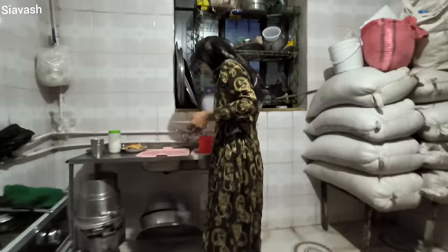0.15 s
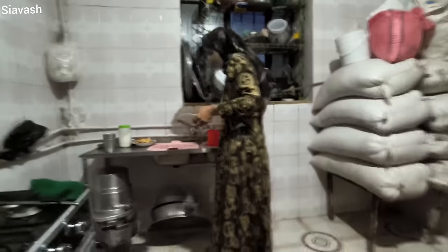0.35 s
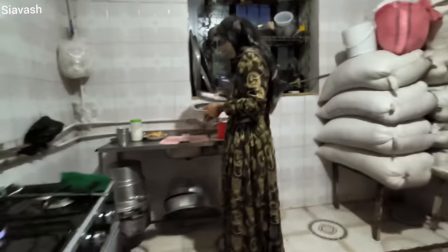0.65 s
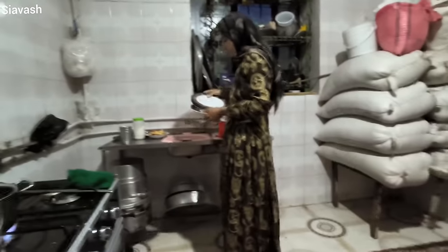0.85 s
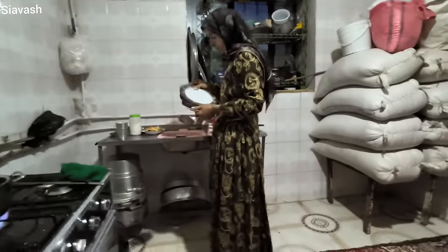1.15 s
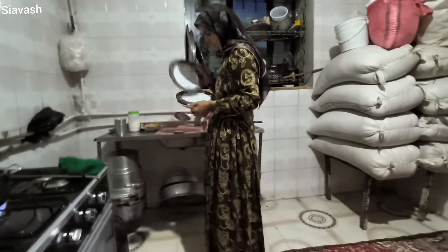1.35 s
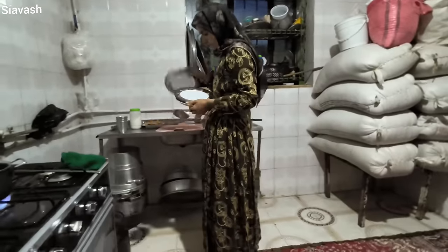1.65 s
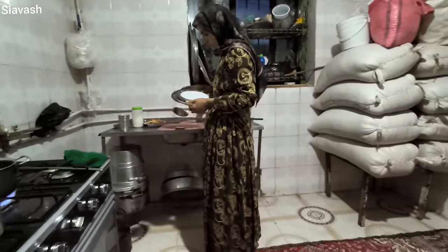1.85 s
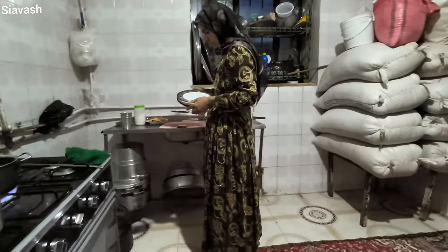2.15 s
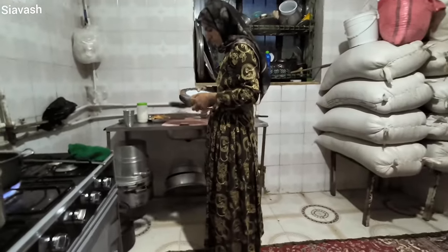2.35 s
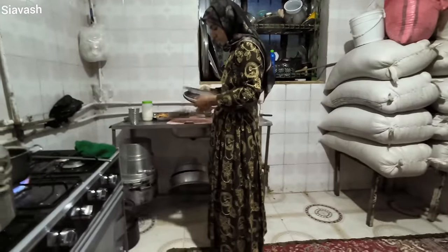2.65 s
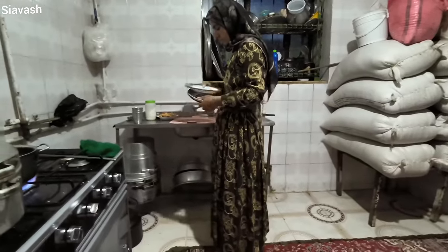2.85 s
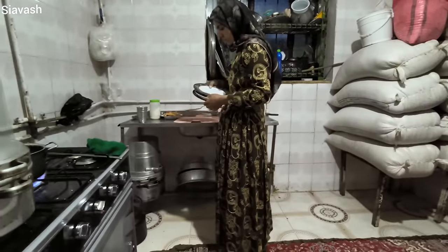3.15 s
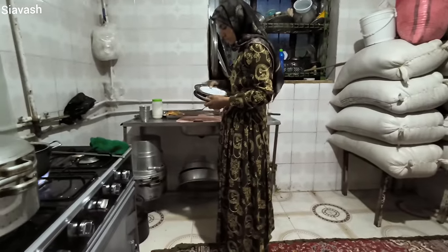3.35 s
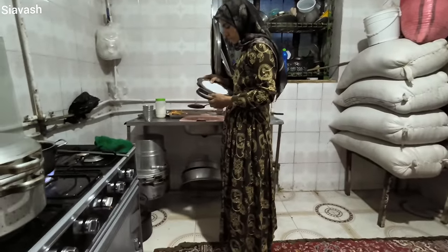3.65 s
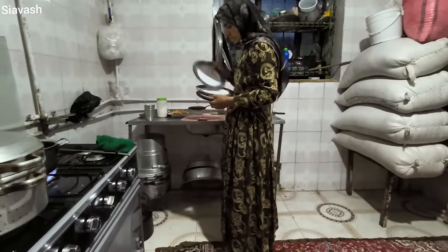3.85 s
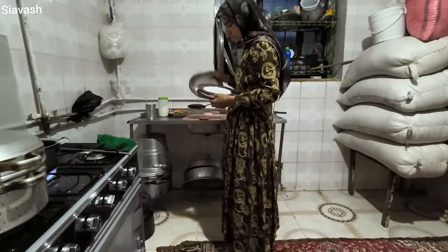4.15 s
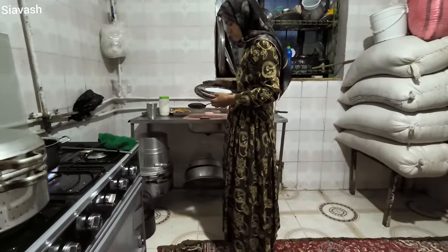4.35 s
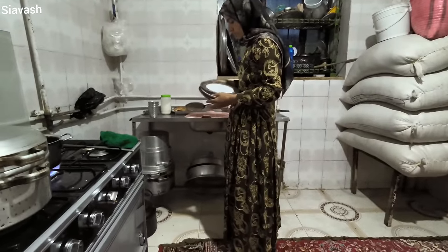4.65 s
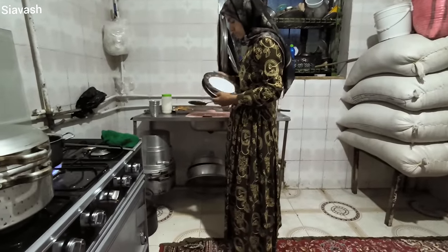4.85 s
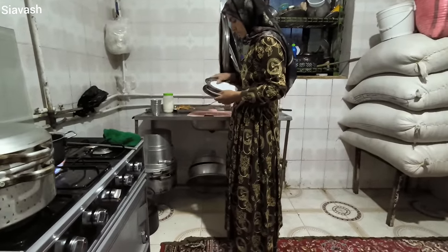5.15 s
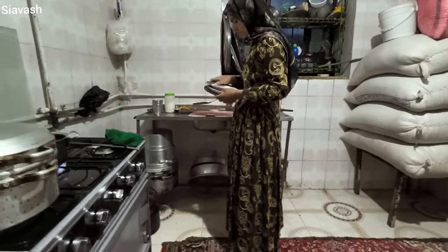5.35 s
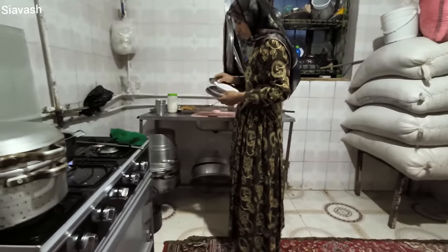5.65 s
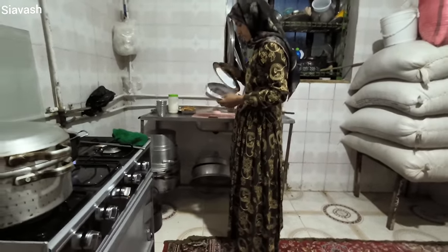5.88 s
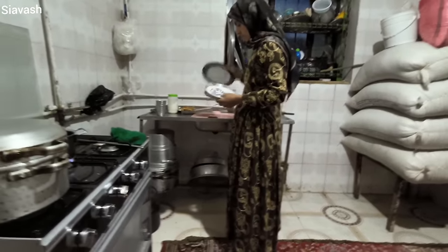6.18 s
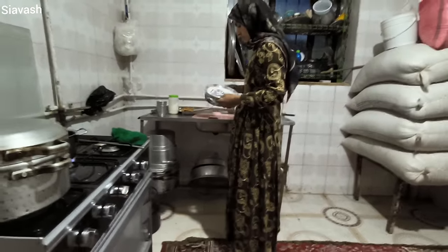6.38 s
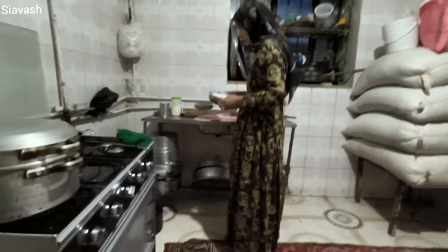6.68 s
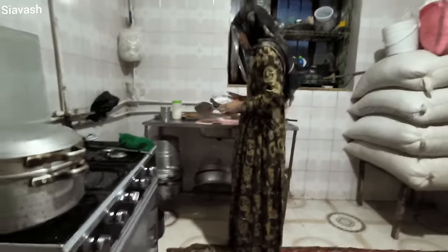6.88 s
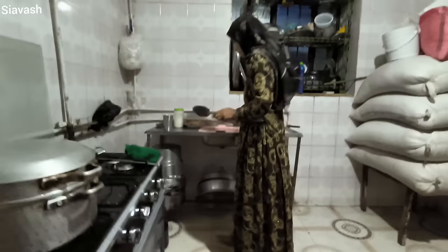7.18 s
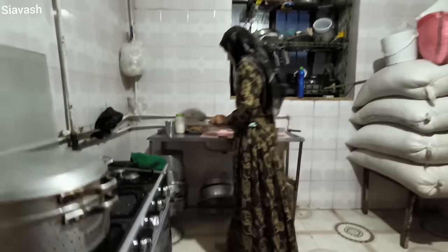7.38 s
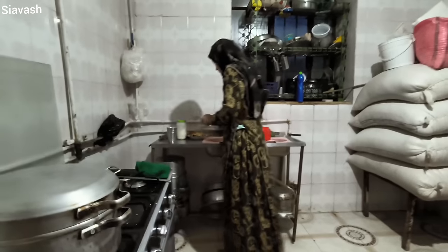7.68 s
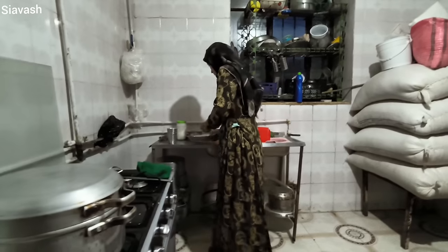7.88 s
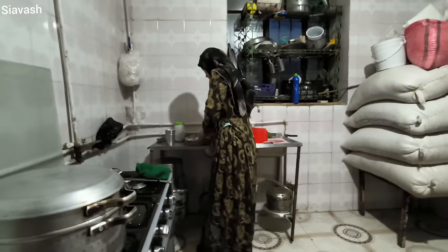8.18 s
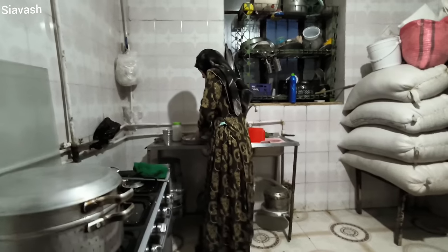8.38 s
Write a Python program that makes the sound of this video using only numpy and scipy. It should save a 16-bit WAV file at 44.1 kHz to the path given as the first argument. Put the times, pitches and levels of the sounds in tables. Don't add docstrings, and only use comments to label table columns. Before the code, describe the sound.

Metal dishes clatter at uneven intervals: short rattling knocks, sharp rim taps, small pings and dull bowl tones, quickly damped by the hand. Busy bursts come near two seconds and again after four, a quieter stretch follows, then hard knocks and a final dense clatter with sink thuds. Hard tiles give strong scattered echoes to the slightly distant stereo pickup, over soft hum, hiss and a thin wavering whistle.

```python
import sys
import numpy as np
from scipy import signal
from scipy.fft import rfft, irfft
from scipy.io import wavfile
from scipy.ndimage import uniform_filter1d

SR = 44100
rng = np.random.default_rng(int(sys.argv[2]) if len(sys.argv) > 2 else 0)


def ratio_of_db(decibels):
    return 10 ** (np.asarray(decibels, float) / 20)


def to_wav(s):
    ch = np.atleast_2d(s).T
    pcm = np.round(np.clip(ch, -1, 1) * 32767)
    wavfile.write(sys.argv[1], SR, pcm.astype(np.int16))


N = 375732


def evened(x):
    return x / np.sqrt(np.mean(x ** 2) + 1e-20)


def read(points, hz):
    f, value = np.transpose(points)
    return np.interp(np.log(hz + 1), np.log(f + 1), value)


def add(mix, s, sound):
    part = mix[max(round(s * SR), 0):][:len(sound)]
    part += sound[:len(part)]


def levelled(x, width_hz, share):
    length = x.shape[-1]
    z = rfft(x, 2 * length)
    size = max(round(width_hz * 2 * length / SR), 1)
    power = uniform_filter1d(abs(z) ** 2, size=size, axis=-1) + 1e-20
    y = irfft(z * (1 / np.sqrt(power)) ** share)[..., :length]
    return y / np.linalg.norm(y, axis=-1, keepdims=True)


def resonate(x, hz, width):
    turn = np.exp(2j * np.pi * np.cumsum(hz * np.ones(x.shape[-1])) / SR)
    r = np.exp(-np.pi * width / SR)
    return 2 * (turn * signal.lfilter([1 - r], [1, -r], x / turn)).real


def ring(hz, t60, split=.02, twin=1.0, rough=0.67):
    t = np.arange(SR // 3) / SR
    flutter = 1 + rough * np.interp(t, np.linspace(0, 1 / 3, 40), rng.standard_normal(40))
    upper = np.sin(2 * np.pi * hz * (1 + split / 2) * t)
    lower = np.sin(2 * np.pi * hz * (1 - split / 2) * t)
    fade = ratio_of_db(-60 * t / max(t60, .02))
    return (upper + twin * lower) * flutter * fade * np.minimum(t / 0.0063, 1)


def contacts():
    # t/s, blow level/dB, treble over blow/dB, bowl f/Hz, bowl over blow/dB
    rattles = [(0, -2, -10.5, 487, -13.5), (1.9675, -8, -7.5, 652, -11), (2.0116, -12, -15.5, 670, -20),
               (2.0832, -16, -8, 684, -8), (2.2094, -29, -14, 704, -13), (2.6644, -27, -12, 666, 4),
               (3.8528, -16.5, -15, 722, -4.5), (4.0462, -20, -15.5, 700, -16),
               (4.3914, -9, -11.5, 607, -17), (4.5233, -3.5, -13, 903, -9.5), (4.7599, -16, -42, 594, -8.5),
               (5.0429, -15, -16, 750, -13), (5.3429, -14.5, -12.5, 717, -24), (6.5829, -7, -6.5, 430, -24),
               (6.6815, -3.5, -11, 729, -10), (6.8057, 1, -10, 553, -21.5), (8.096, -6.5, -9.5, 760, -28),
               (8.2007, -28, 7.5, 630, -17), (8.2719, -14, -8, 636, -10.5),
               (8.3815, -12, -12.5, 573, -15.5), (8.4431, -3, -8.5, 562, -21), (8.473, -24.5, -8.5, 477, 4)]
    # t/s, blow level/dB, treble over blow/dB, bowl f/Hz, bowl over blow/dB
    taps = [(1.8866, -46.5, -4.5, 590, -32), (1.9491, -38, -8, 1050, -12), (2.1185, -17, -4, 700, -18),
            (4.358, -30, -9, 600, -27), (3.886, -24, -12, 700, -23), (.39, -26, -10, 830, -11),
            (.8474, -11.5, -7.5, 710, -7), (1.3661, -8.5, -4.5, 758, -14), (2.123, -8.5, -6, 641, -2.5),
            (2.5276, -13.5, -5.5, 436, -12.5), (2.6087, -20.5, -7, 424, -15), (2.7492, -10, -6, 668, -7.5),
            (2.8779, -21, -13.5, 714, -10.5), (3.0969, -11, -11.5, 650, -12),
            (3.2393, -17, -10.5, 680, -9.5), (3.7229, -16, -13.5, 704, -11),
            (4.117, -16.5, -12.5, 724, -18), (4.5514, -30, -3, 703, 4), (4.6744, -23, -8.5, 565, -12),
            (4.78, -4.5, -13, 570, -24), (4.9635, -13.5, -11, 652, -15), (5.1218, -22.5, -7.5, 674, -9),
            (7.0439, -23, -14.5, 834, -8), (7.6197, -7, -12.5, 487, -18), (7.6587, -20.5, -34, 440, -32),
            (7.8493, -26.5, -16, 456, -19)]
    # t/s, blow level/dB, treble over blow/dB, bowl f/Hz, bowl over blow/dB
    clacks = [(.7761, -6.5, -6, 804, -30), (.9916, -16.5, -10, 697, -4.5), (1.1405, -29, -4.5, 730, -20),
              (2.177, -10, -10.5, 630, -15), (2.4785, -19.5, -13, 579, -14),
              (2.9296, -18.5, -13, 490, -12.5), (3.0627, -22.5, -6.5, 718, -6.5),
              (3.1824, -25, -25, 727, -8), (3.3666, -21.5, -15, 723, -7.5), (3.8906, -12, -6.5, 732, -11),
              (4.3652, -7.5, -6, 468, -22), (4.9106, -18.5, -12, 755, -12),
              (5.7085, -20.5, -11.5, 741, -3.5), (6.8483, -6.5, -42, 530, -25),
              (7.2469, -14.5, -18, 730, -15), (7.3208, -17, -12, 500, -16.5), (8.1047, -2.5, -18, 700, -22),
              (8.122, -13.5, -3, 440, -10.5), (8.14, -19, -1.5, 516, -7), (8.1555, -15.5, 1.5, 728, -11),
              (8.172, -22, -4, 595, -14), (8.187, -18, -10, 675, -11), (8.245, -12.5, -19, 500, -26),
              (8.437, -11.5, -11.5, 548, -18), (8.398, -18, -17, 500, -15), (1.9725, -12.5, -3, 708, -6),
              (2.108, -17, -22, 690, -12), (2.197, -14.5, -14, 680, -12), (6.674, -11, -14, 710, -8),
              (6.699, -14.5, -23, 717, -4.5), (0.7811, -11, -8, 1015, -20)]
    # t/s, blow level/dB, bowl f/Hz
    touches = [(1.0394, -34, 770), (1.1606, -28, 800), (.757, -30, 710), (1.328, -35.5, 724),
               (1.355, -46, 720), (1.958, -43, 700), (4.345, -41, 600), (4.7, -41, 597), (6.569, -35, 500),
               (6.645, -10.5, 1020), (2.5689, -33, 680), (3.6024, -35.5, 650), (5.2086, -36, 685),
               (5.599, -33.5, 586), (5.8686, -31, 730), (5.9209, -30.5, 797), (6.0322, -32, 520),
               (6.109, -31, 704), (7.1946, -47, 453), (8.077, -32.5, 497)]
    treble_db, bowl_db = -12, -9.5
    touches = [(s, db, treble_db, hz, bowl_db) for s, db, hz in touches]
    tap_s, clack_s, rattle_s, touch_s = 0.0061, 0.0098, 0.02, 0.024
    kinds = (taps, tap_s), (clacks, clack_s), (rattles, rattle_s), (touches, touch_s)
    return sorted((*row, chatter_s) for rows, chatter_s in kinds for row in rows)


def plate(count=340):
    # f/Hz, level/dB
    strengths = [(88, -58), (150, -13), (194, -17.5), (643, -5.5), (1030, -7.5), (2090, -7), (2550, -10),
                 (3230, -5.5), (5820, -5.5), (8450, -0.5), (8620, -9.5), (10900, -15), (13200, -19.5),
                 (14600, -15), (15600, -31.5), (16500, -53)]
    # f/Hz, T60/s
    decays = [(300, 0.17), (2000, 0.048), (8000, 0.026), (15000, 0.0037)]
    # f/Hz, width/Hz, level over the dense modes/dB
    set_modes = [(1017, 17, 6), (1455, 120, 2.5), (1710, 52, 0.5), (2210, 270, 5.5), (2706, 270, 4.5),
                 (3180, 68, 1), (4430, 135, -2.5), (5110, 120, 2), (5520, 400, 2.5), (6530, 480, 4),
                 (7250, 360, 3.5)]
    spot, chance, spread, phase = rng.random((4, count, 1))
    spot = (np.arange(count)[:, None] + spot) / count
    hz = 250 + 15400 * spot ** 1.3
    t = np.arange(SR // 7) / SR
    t60 = read(decays, hz) * (.5 + 0.16 * spread)
    db = -3.0 * np.log(chance + 0.0074) - 10 * np.log10(t60)
    fade = np.exp((-np.log(1000) * t / t60).astype(np.float32))
    swing = np.sin((2 * np.pi * (hz * t + phase)).astype(np.float32))
    modes = levelled((ratio_of_db(db) * fade * swing).sum(0), 45, 0.93)

    bins = np.fft.rfftfreq(2 * len(t), 1 / SR)
    centre, width, lift_db = np.transpose(set_modes)[:, :, None]
    detune, strength = rng.random((2, len(set_modes), 1))
    offset = (bins - centre * (.985 + 0.02 * detune)) / width
    lifts = 2 * strength * lift_db / (1 + (2 * offset) ** 2)
    colour = ratio_of_db(read(strengths, bins) + lifts.sum(0))
    crack = 1 + 1.3 * np.exp(-t / 0.007)
    return modes * np.minimum(t / 0.0009, 1) * crack, colour


def strike(force):
    modes, colour = plate()
    log_gain = np.log(np.concatenate([colour, colour[-2:0:-1]]) + 1e-5)
    shape = np.fft.ifft(np.exp(np.conj(signal.hilbert(log_gain)))).real[:4096]
    body = signal.fftconvolve(modes, shape)
    return signal.oaconvolve(force, body / np.linalg.norm(body))[:N]


def knocks(count=5):
    force, bowls = np.zeros((count, N)), np.zeros(N)
    t = np.arange(SR // 8) / SR
    rows = contacts()
    noise = rng.standard_normal((len(rows), len(t)))
    low = signal.butter(2, 4000, fs=SR, output="sos")
    for k, (s, blow_db, treble_db, bowl_hz, bowl_db, chatter_s) in enumerate(rows):
        chatter_s = max(chatter_s, .001)
        rattle = noise[k] ** 3 * np.exp(-t / chatter_s)
        rattle *= np.minimum(t / (0.11 * chatter_s), 1)
        rattle[:1] += 0.016 / chatter_s * np.linalg.norm(rattle)
        rattle = levelled(rattle, 120, 0.93)
        dull = signal.sosfilt(low, rattle)
        blow = dull + ratio_of_db(treble_db + 6) * (rattle - dull)
        add(force[k % count], s, ratio_of_db(blow_db + 20) * blow)
        bowl = ring(bowl_hz, 0.059, split=0.059)
        add(bowls, s, ratio_of_db(blow_db + bowl_db) * bowl)
    return bowls + sum(strike(f) for f in force)


def tones():
    # t/s, level/dB, f/Hz, T60/s
    thuds = [(0.0, -17, 434, 0.057), (0.777, -43, 440, 0.2), (1.367, -24.5, 348, 0.12),
             (1.966, -19.5, 453, 0.21), (2.172, -20.5, 328, 0.14), (2.175, -15, 485, 0.22),
             (2.185, -26, 720, 0.11), (2.55, -36, 450, 0.16), (2.603, -24, 431, 0.17),
             (2.852, -26, 429, 0.28), (3.096, -29, 394, 0.24), (4.365, -33, 460, 0.18),
             (4.549, -29, 183, 0.14), (5.059, -36.5, 241, 0.17), (6.579, -29.5, 343, 0.23),
             (6.68, -28, 443, 0.23), (6.873, -31, 245, 0.13), (8.105, -8, 287, 0.11),
             (8.128, -23, 370, 0.16), (8.165, -16, 310, 0.14), (8.11, -20, 470, 0.13),
             (8.14, -9.5, 696, 0.12), (8.15, -23, 398, 0.17), (8.19, -23, 317, 0.093),
             (8.23, -26, 251, 0.14), (8.26, -30, 405, 0.2), (8.31, -29, 420, 0.13), (8.4, -29, 263, 0.17),
             (8.47, -21.5, 550, 0.17), (8.386, -23, 153, 0.32), (8.437, -8, 139, 0.071),
             (8.462, -12.5, 129, 0.37)]
    # t/s, level/dB, f/Hz, T60/s
    free_bowls = [(0.0, -34, 481, 0.34), (.005, -35, 149, 0.053), (.392, -43, 730, 0.05),
                  (0.782, -32, 1005, 0.1), (0.788, -33, 479, 0.19), (0.791, -41.5, 125, 0.11),
                  (2.7484, -41, 2180, 1), (8.437, -24, 127, 0.2), (8.108, -28, 284, 0.12),
                  (8.16, -27, 6160, 0.4), (8.19, -32, 5570, 0.33), (4.78, -33.5, 560, 0.34),
                  (5.709, -46, 740, 0.2), (6.691, -34.5, 131, 0.082), (6.806, -32, 534, 0.12),
                  (8.096, -32.5, 165.4, 0.17), (8.179, -33.5, 126, 0.1), (8.26, -37, 199, 0.11),
                  (8.299, -45, 306, 0.11), (8.451, -23.5, 245.6, 0.14)]
    # t/s, level/dB, f/Hz, T60/s
    pings = [(0.774, -9, 2560, 0.11), (1.3678, -8, 4090, 0.1), (1.9694, -11, 6680, 0.15),
             (2.1226, -21, 6170, 0.15), (2.5292, -28, 4770, 0.12), (2.7501, -21, 6240, 0.17),
             (3.8916, -26, 6260, 0.15), (4.3654, -17, 6900, 0.15), (4.5221, -20, 6500, 0.15),
             (4.779, -12, 4100, 0.025), (4.779, -6, 3300, 0.047), (4.779, -16, 6360, 0.04),
             (1.3678, -9, 5630, 0.05), (6.5834, -16, 6250, 0.13), (6.809, 7, 2910, 0.034),
             (7.3208, -32, 3160, 0.18), (8.1544, -17, 6500, 0.15), (8.19, -25, 5500, 0.21)]
    # t/s, level/dB, f/Hz, T60/s
    rims = [(0.7761, -24, 2400, 0.14), (2.1194, -23.5, 1490, 0.12), (3.0994, -26, 2230, 0.052),
            (4.9, -20, 2700, 0.054), (4.7795, -30, 2400, 0.056), (3.7, -37, 1900, 0.03),
            (0.785, -25, 1800, 0.14), (1.968, -22, 1300, 0.049), (1.368, -32, 1400, 0.09),
            (1.41, -28, 975, 0.066), (1.405, -31.5, 735, 0.096), (2.125, -30, 1000, 0.066),
            (4.9604, -33, 1440, 0.08), (3.2395, -31, 1360, 0.07), (5.7094, -39, 2300, 0.097),
            (6.8073, -14.5, 2346, 0.034)]
    out = np.zeros(N)
    for s, db, hz, t60 in thuds:
        add(out, s, ratio_of_db(db - 6.5) * ring(hz, 0.54 * t60, split=0.054, rough=0.42))
    for s, db, hz, t60 in free_bowls:
        add(out, s, ratio_of_db(db) * ring(hz, t60, split=0.0039, rough=0.022))
    for s, db, hz, t60 in pings:
        add(out, s, ratio_of_db(db - 17) * ring(hz, t60, split=0.0043))
    for s, db, hz, t60 in rims:
        add(out, s, ratio_of_db(db + 1.5) * ring(hz, t60, split=0.0083))
    return out


def tiles(x, count=3):
    # f/Hz, T60/s
    room_decay = [(150, 0.8), (600, 0.5), (2500, 0.41), (8000, 0.3), (15000, 0.13)]
    out, turn = np.zeros((2, N)), np.arange(N) / SR * 2.3
    for k in range(count):
        taps = np.zeros((2, SR // 2))
        at = np.arange(60, SR // 2 - 20, 12) + rng.integers(0, 12, (2, (SR // 2 - 69) // 12))
        np.put_along_axis(taps, at, rng.choice([-1., 1.], at.shape), 1)
        hz, t, z = signal.stft(taps, SR, nperseg=256)
        near_walls = 1 + 2.6 * np.exp(-t / 0.0027)
        z *= ratio_of_db(-60 * t / read(room_decay, hz)[:, None]) * near_walls
        same = np.clip(1 - (hz / 720) ** 2, 0, 1)[:, None]
        z[1] = same * z[0] + np.sqrt(1 - same ** 2) * z[1]
        tail = levelled(signal.istft(z, SR, nperseg=256)[1], 64, 0.76)
        tail /= np.linalg.norm(tail[0])
        share = np.sqrt(2 / count) * np.cos(np.pi * (turn + k / count))
        out += signal.oaconvolve((x * share)[None], tail, axes=1)[:, :N]
    return out


def hiss():
    # f/Hz, level per Hz/dB
    spectrum = [(16, -40), (32, -15), (134, -11), (214, -11.5), (239, -11.5), (306, -13.5), (577, -16.5),
                (849, -23.5), (5090, -31), (7400, -19), (8450, -22), (8650, -29.5), (13300, -40.5),
                (14500, -50)]
    # f/Hz, left-right likeness
    likeness = [(60, 0.69), (240, 0.78), (950, 0.034), (3770, -0.16), (15000, -0.011)]
    # f/Hz, width/Hz, level/dB
    hum_lines = [(129, 10, -70), (243.5, 6, -59), (276.5, 6, -62), (537, 20, -69)]
    frames, hz = N // 256 + 5, np.fft.rfftfreq(1024, 1 / SR)
    a, b, c, d, patches = rng.standard_normal((frames, 513, 5)).T
    patches = evened(uniform_filter1d(uniform_filter1d(patches, 12, 0), 14, 1))
    same = np.clip(read(likeness, hz), -1, 1)[:, None]
    left = a + 1j * b
    z = np.array([left, same * left + np.sqrt(1 - same ** 2) * (c + 1j * d)])
    z *= ratio_of_db(read(spectrum, hz)[:, None] + 1.5 * patches)
    noise = signal.istft(z, nperseg=1024, noverlap=768)[1][:, :N]
    out = ratio_of_db(-51.5 - 2.5) * evened(noise)
    buzz, t = rng.standard_normal(N), np.arange(N) / SR
    for f, width, db in hum_lines:
        skirt = evened(resonate(resonate(buzz, f, width), f, width))
        out = out + ratio_of_db(db) * evened(skirt + 1.7 * np.sin(2 * np.pi * f * t))
    return out


def whistle():
    # t/s, f/Hz, left level/dB, right level/dB
    path = [(0, 15285, -34, -43), (.5, 15262, -38, -32), (.93, 15258, -34, -47), (1.45, 15262, -33.5, -43),
            (1.9, 15258, -48, -39), (2.5, 15270, -40, -54), (3.1, 15270, -35, -32), (3.4, 15272, -39, -39),
            (3.9, 15268, -47, -44), (4.55, 15274, -38.5, -38), (4.8, 15276, -31.5, -31),
            (5.38, 15268, -46, -43), (5.65, 15272, -36, -33), (6.101, 15268, -42, -42),
            (6.65, 15278, -31, -37), (7.1, 15272, -38, -40), (7.5, 15266, -43, -33.5),
            (8.52, 15255, -44, -37)]
    # t/s, length/s
    jumps = [
        (.15, .07),
        (6.85, .33),
    ]
    jump_hz, fading_hz, fading_db = 72, 14, 1
    t = np.arange(N) / SR
    s, *columns = np.transpose(path)
    hz, *db = (np.interp(t, s, c) for c in columns)
    jumping = sum(1. * (t > a) * (t < a + d) for a, d in jumps)
    hz = hz + jump_hz * uniform_filter1d(jumping, size=900)
    noise = rng.standard_normal((2, N))
    quarter_turn = np.array([[0], [np.pi / 2]])
    tone = np.sqrt(2) * np.cos(2 * np.pi * np.cumsum(hz) / SR + quarter_turn)
    echoes = evened(resonate(resonate(noise, hz, fading_hz), hz, fading_hz))
    waver = evened(resonate(resonate(noise[:, ::-1], hz, 70), hz, 70))
    band = signal.butter(6, [14950, 15700], "band", fs=SR, output="sos")
    skirt = evened(signal.sosfilt(band, noise[::-1]))
    dip_db = 4 * (t > 6.85) * (t < 7.18)
    line = tone + ratio_of_db(fading_db) * echoes + ratio_of_db(-10) * waver
    return ratio_of_db(np.array(db) - 4.5 - dip_db) * line + ratio_of_db(-63) * skirt


def bong():
    s, db, hz, t60, beat_hz = 0.778, -19.5, 742, 0.8, 18
    hand_s, hand_db_per_s = 0.14, 280
    out, t = np.zeros(N), np.arange(SR // 2) / SR
    upper = 0.5 * np.sin(2 * np.pi * (hz + beat_hz / 2) * (t - 0.019))
    lower = -np.sin(2 * np.pi * (hz - beat_hz / 2) * (t - 0.019))
    fade_db = -60 * t / t60 - hand_db_per_s * np.maximum(t - hand_s, 0)
    add(out, s, ratio_of_db(db + fade_db) * (upper + lower) * np.minimum(t / 0.013, 1))
    return out


def ports(x):
    # f/Hz, left over right level/dB
    lean = [(5000, 0), (7150, -6), (7750, -1), (8300, 6), (9000, 9), (11000, 6), (14000, 4)]
    # f/Hz, width/Hz, level/dB
    left_modes = [(8300, 220, -1), (8462, 24, 7)]
    hz = np.linspace(0, SR / 2, num=513)
    taps = [signal.firwin2(401, hz, ratio_of_db(side * read(lean, hz) / 2), fs=SR) for side in (1, -1)]
    left, right = signal.oaconvolve(x, np.array(taps), "same", axes=1)
    ringing = sum(ratio_of_db(db) * resonate(left, f, width) for f, width, db in left_modes)
    return np.array([left + ringing, right])


def scene():
    clatter, notes, bowl = knocks(), tones(), bong()
    dishes = clatter + ratio_of_db(-3.5) * notes
    direct = ratio_of_db(-10.0) * dishes * ratio_of_db(np.array([[1.], [-1.]]))
    echoes = ratio_of_db(-0.5) * tiles(dishes + ratio_of_db(-20) * bowl)
    return direct + echoes + bowl + ratio_of_db(-11.5) * notes + hiss() + whistle()


def low_pass(x):
    return signal.sosfilt(signal.butter(12, 16990, fs=SR, output="sos"), x)


def record(dry):
    limited = np.tanh(ports(dry) / 0.79) * 0.91
    limited = signal.sosfilt(signal.butter(2, 120, "high", fs=SR, output="sos"), limited)
    slow = signal.butter(2, [22, 80], "band", fs=SR, output="sos")
    pump = signal.sosfilt(slow, (limited ** 2).mean(0))
    limited = limited + ratio_of_db(-26) * pump
    band_edge = signal.firwin(255, 15900, window=("kaiser", 9), fs=SR)
    mix = signal.oaconvolve(limited, band_edge[None], "same")
    return low_pass(mix)


dry = scene()
out = record(dry)
to_wav(out)
```